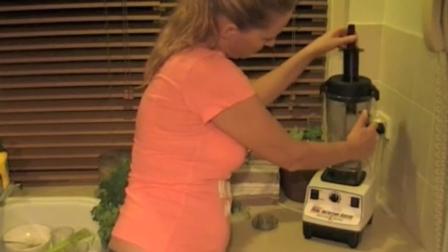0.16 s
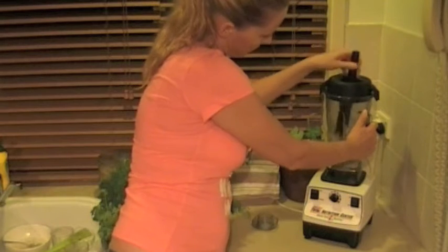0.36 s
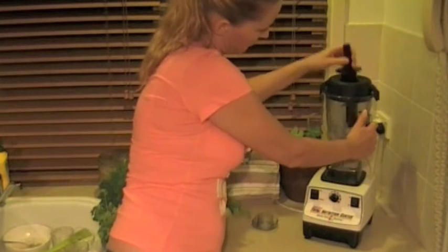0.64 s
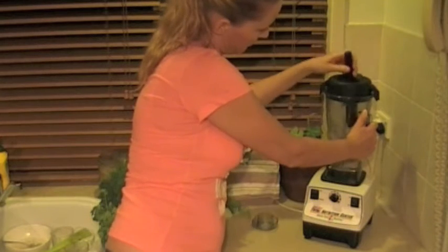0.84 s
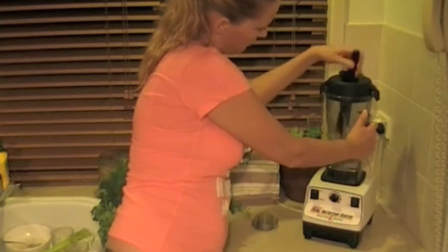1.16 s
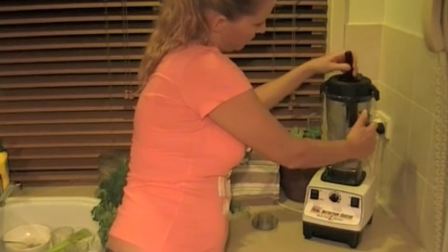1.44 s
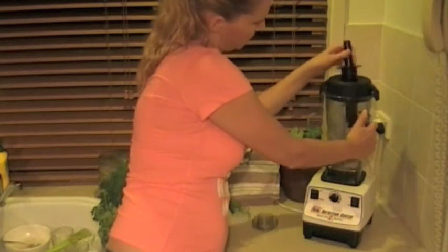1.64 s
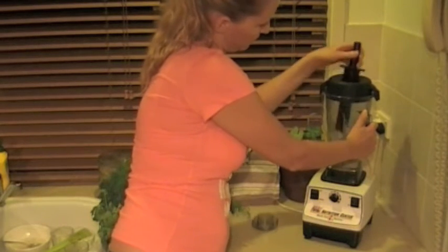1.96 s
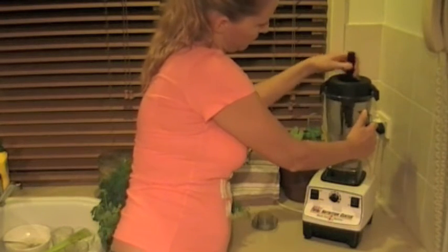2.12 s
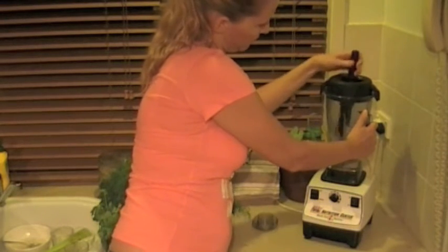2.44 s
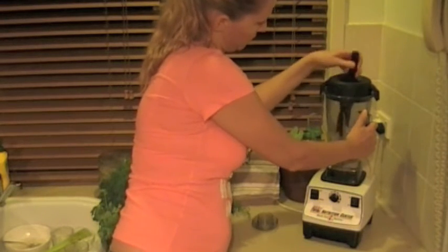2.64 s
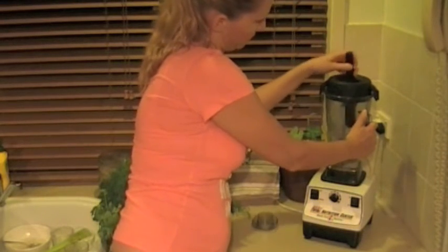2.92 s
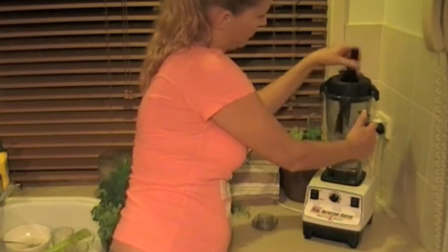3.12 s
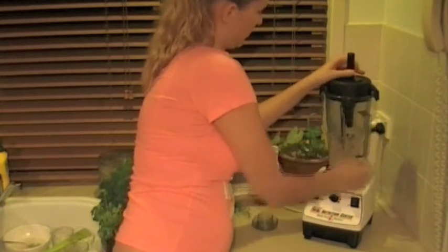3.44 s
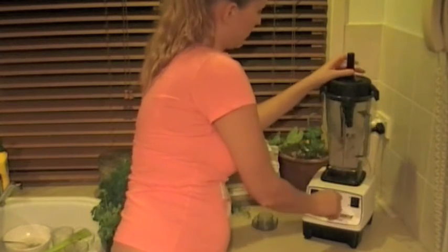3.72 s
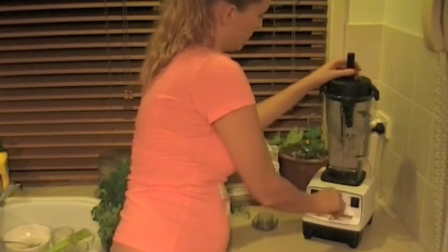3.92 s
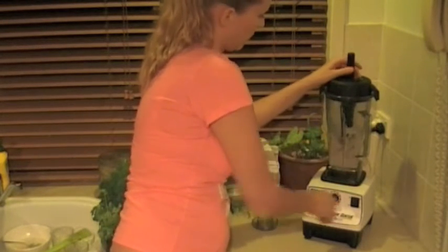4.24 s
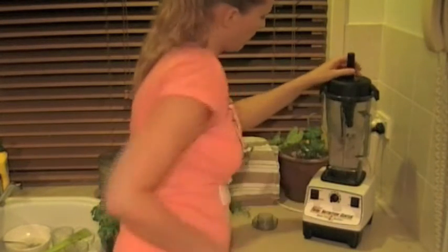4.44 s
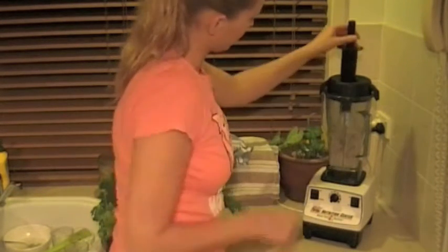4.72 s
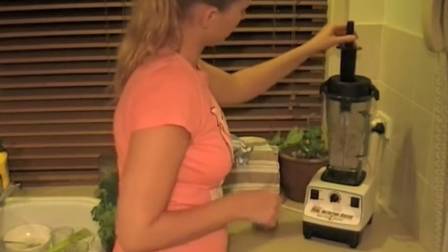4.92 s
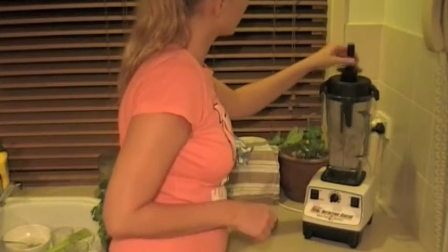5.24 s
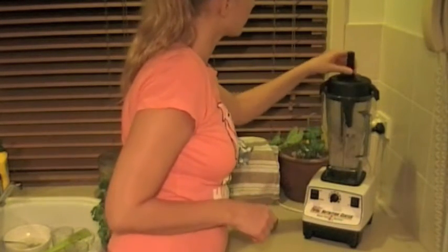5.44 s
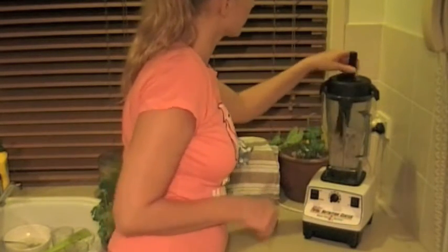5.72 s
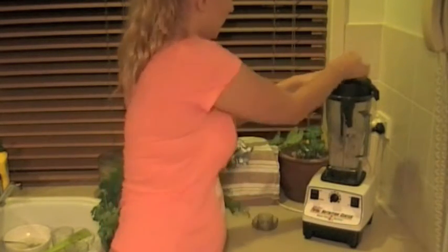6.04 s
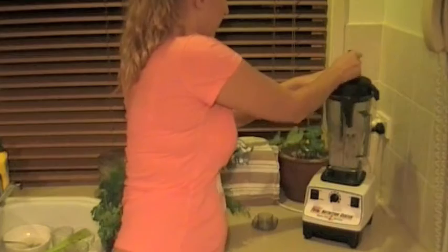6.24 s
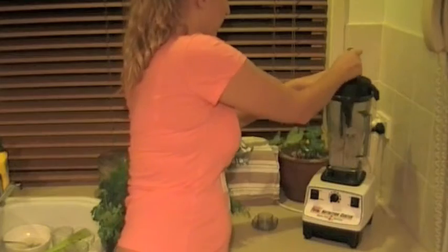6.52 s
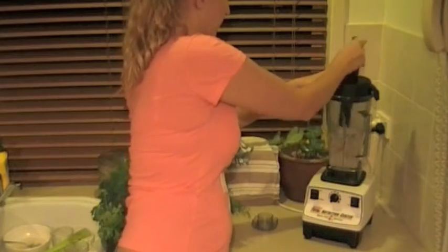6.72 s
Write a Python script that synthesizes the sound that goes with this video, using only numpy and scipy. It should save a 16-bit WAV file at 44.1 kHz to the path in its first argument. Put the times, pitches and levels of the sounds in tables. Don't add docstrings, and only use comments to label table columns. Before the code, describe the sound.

In a hard tiled kitchen, a blender runs at low speed, its food rattling gustily while hard bits crack against the jar and a tamper thuds dully. Just before four seconds it switches to high; the rattle surges louder, the motor pitch climbs unsteadily, and a whining, hissing roar holds to the end. A small camera microphone gives thin bass.

```python
import sys
import numpy as np
from scipy import signal
from scipy.fft import rfft, irfft
from scipy.io import wavfile
from scipy.ndimage import uniform_filter1d

SR = 44100
rng = np.random.default_rng(int(sys.argv[2]) if len(sys.argv) > 2 else 0)


def wav_record(signal):
    frames = np.transpose(np.atleast_2d(signal))
    bounded = np.clip(frames, -1, 1)
    quanta = np.round(bounded * 32767).astype(np.int16)
    wavfile.write(sys.argv[1], SR, quanta)


def attenuation_scalar(level_db):
    decades = np.asarray(level_db, float) / 20
    return 10 ** decades


N = 302967
SWITCH_S, SPIN_UP_S = 3.745, 0.05


def evened(x):
    return x / np.sqrt(np.mean(abs(x) ** 2) + 1e-20)


def read(points, hz):
    f, value = np.transpose(points)
    return np.interp(np.log(hz + 1), np.log(f + 1), value)


def add(mix, s, sound):
    part = mix[round(s * SR):][:len(sound)]
    part += sound[:len(part)]


def ramp(t, start_s, length_s):
    return np.clip((t - start_s) / length_s, 0, 1)


def swells(t, rows):
    s, length, *columns = np.transpose(rows)
    coarse = t[::64]
    humps = np.cos(np.pi / 2 * np.clip(2 * (coarse[:, None] - s) / length, -1, 1)) ** 2
    return [np.interp(t, coarse, humps @ c) for c in columns]


def wobble(size, width_hz):
    r = np.exp(-np.pi * width_hz / SR)
    z = rng.standard_normal((size + 4000, 2)) @ [1, 1j]
    return evened(signal.lfilter([1], [1, -2 * r, r * r], z)[4000:])


def bell(hz, middle, width):
    return 1 / (1 + (2 * (hz - middle) / width) ** 2)


def ringing(hz, rings):
    return 1 + sum(attenuation_scalar(db) * bell(hz, f, w) for f, w, db in rings)


def notched(hz, gaps):
    return np.prod([1 - min(depth, .9) * bell(hz, f, w) for f, w, depth in gaps], axis=0)


def kitchen(x):
    at = np.arange(120, 12000, 22) + rng.integers(0, 22, (2, 540))
    taps = np.zeros((2, 12100))
    decay = attenuation_scalar(-60 * at / SR / 0.34)
    np.put_along_axis(taps, at, rng.choice([-1., 1.], at.shape) * decay, 1)
    return signal.fftconvolve(x[None], taps / np.linalg.norm(taps[0]), axes=1)[:, :N]


def buzz():
    # frequency in Hz, level in dB.
    mains_lines = [(200.2, -76), (500.3, -49), (600.3, -50), (700.5, -53)]
    t = np.arange(N) / SR
    hum = np.zeros(N)
    for hz, db in mains_lines:
        unsteady = 1 + 0.44 * wobble(N, 10.0)
        hum += attenuation_scalar(db) * (np.exp(2j * np.pi * hz * t) * unsteady).real
    return np.sqrt(2) * hum * attenuation_scalar(-5 * ramp(t, SWITCH_S, SPIN_UP_S))


def squeals():
    # start in seconds, length in seconds, frequency in Hz, width in Hz, level in dB.
    squeal_rows = [(.08, .34, 446, 10, -41), (0, .08, 9200, 90, -44), (.12, .22, 9100, 120, -39),
                   (.62, .14, 9450, 150, -44), (2.27, .08, 10400, 100, -46), (4.76, .45, 390, 30, -48),
                   (4.27, .1, 944, 20, -29), (6.42, .16, 3560, 50, -33), (3.47, .25, 145, 10, -62),
                   (5.9, .5, 7300, 90, -41), (4.8, 1.5, 8850, 160, -42), (.36, .17, 447, 12, -44),
                   (.05, .35, 3400, 90, -41), (5.62, .2, 2520, 40, -37), (3.2, .13, 1060, 50, -38)]
    out = np.zeros(N)
    for s, length, hz, width_hz, db in squeal_rows:
        t = np.arange(0, length, 1 / SR)
        tone = (np.exp(2j * np.pi * hz * t) * (.7 + .7 * wobble(len(t), width_hz))).real
        add(out, s, attenuation_scalar(db) * tone * signal.windows.tukey(len(t), .4))
    return out


def splashes():
    # start in seconds, length in seconds, frequency in Hz, width in Hz, level in dB.
    splash_rows = [
        (.65, .06, 10600, 900, -43),
        (1.27, .03, 9300, 1500, -42),
        (1.46, .07, 11200, 800, -43),
        (1.8, .04, 9300, 1300, -42),
        (2.39, .03, 10000, 900, -43),
        (2.87, .06, 10900, 1200, -41),
        (3.1, .03, 10800, 1000, -40),
        (3.22, .06, 10600, 1300, -41),
    ]
    out = np.zeros(N)
    for s, length, hz, width_hz, db in splash_rows:
        t = np.arange(0, length, 1 / SR)
        spray = (np.exp(2j * np.pi * hz * t) * wobble(len(t), width_hz)).real
        add(out, s, attenuation_scalar(db + 5.5) * spray * signal.windows.tukey(len(t), .6))
    return out


def bumps():
    # start in seconds, peak in dB, ring in Hz, t60 in seconds.
    bump_rows = [(0.37, -37, 325, 0.16), (0.719, -46, 384, 0.12), (0.892, -43, 272, 0.1),
                 (1.289, -43, 290, 0.12), (1.584, -36, 270, 0.085), (1.661, -41, 320, 0.17),
                 (1.803, -40, 377, 0.12), (2.454, -36, 320, 0.14), (2.569, -48, 312, 0.13),
                 (3.115, -27, 381, 0.081), (3.129, -38, 385, 0.1), (3.39, -53, 396, 0.12),
                 (3.824, -35, 382, 0.084), (6.845, -39, 353, 0.15)]
    out = np.zeros(N)
    t = np.arange(6000) / SR
    soft_onset = 1 - np.exp(-t / 0.0018)
    for s, db, hz, t60 in bump_rows:
        thud = np.sin(2 * np.pi * hz * t) + 0.12 * np.sin(np.pi * hz * t)
        add(out, s, attenuation_scalar(db - 1.5 - 60 * t / t60) * thud * soft_onset)
    return out


def knocks():
    # start in seconds, peak in dB, ring in Hz.
    knock_rows = [(0.275, -20, 1390), (0.519, -19.5, 1080), (0.99, -20.5, 2900), (1.04, -21.5, 1050),
                  (1.269, -16.5, 1075), (1.361, -31, 990), (1.489, -23, 896), (1.579, -14.5, 1086),
                  (2.039, -22, 865), (2.206, -30, 930), (2.343, -16.5, 1034), (2.421, -16.5, 1085),
                  (2.684, -20, 925), (2.803, -20, 936), (3.246, -26, 1080), (3.32, -20, 1010)]
    out = np.zeros(N)
    t = np.arange(6000) / SR
    wall = signal.butter(2, [700, 3300], "band", fs=SR)
    ring_shape = attenuation_scalar(-60 * t / 0.061) * (1 - np.exp(-t / 0.00062))
    for s, db, hz in knock_rows:
        crack = 1.7 * signal.lfilter(*wall, rng.standard_normal(len(t))) * attenuation_scalar(-60 * t / 0.094)
        ring = np.sin(2 * np.pi * hz * t) * ring_shape
        add(out, s, attenuation_scalar(db - 5) * (ring + crack))
    return out


def gusty_noise(colour, lift, gusts_db):
    hz = np.fft.rfftfreq(2048, 1 / SR)
    noise = rng.standard_normal(N) * attenuation_scalar(gusts_db)
    z = signal.stft(noise, nperseg=2048, noverlap=1536)[2]
    patches = uniform_filter1d(rng.standard_normal(z.shape), 30, 0)
    patches_db = evened(uniform_filter1d(patches, 6, 1))
    z = z * attenuation_scalar(read(colour, hz)[:, None] + patches_db) * lift[:, None]
    return evened(signal.istft(z, nperseg=2048, noverlap=1536)[1][:N])


def churn():
    # frequency in Hz, level in dB per Hz.
    slow_colour = [(40, -34), (120, -24), (330, -9), (420, -3), (490, 1), (570, 0), (650, -4.5), (950, 5),
                   (1300, 5.5), (1600, 3), (3000, 3.5), (4200, -1.5), (6000, -2), (7500, -29)]
    surge_colour = [(40, -42), (120, -38), (330, -20), (480, -6), (570, -5), (650, -4.5), (950, 6),
                    (1300, 4), (2000, 1), (2700, 5.5), (3500, 2.5), (4800, 0), (6000, -0.5), (7500, -12.5)]
    fast_colour = [(40, -50), (120, -44), (200, -31), (420, -16.5), (500, -5.5), (600, -7), (780, 0.5),
                   (1100, -3), (1300, -2), (2000, -2), (3200, -1), (4200, -1.5), (6000, -6), (7500, -9)]
    spray_colour = [(4500, -36), (6300, 4.5), (7500, 2), (9500, 2), (11000, 2), (12500, 2), (14300, 3.5),
                    (15000, 5), (15700, -1)]
    # frequency in Hz, width in Hz, lift in dB.
    body_rings = [(447, 15, 0), (505, 50, 3), (770, 40, -3), (862, 25, -2), (945, 40, -3), (1008, 25, -3),
                  (1062, 30, 0), (1890, 90, -3), (2430, 80, -4), (2900, 80, -5), (3620, 200, -6),
                  (4950, 300, -8), (7300, 120, -8), (8830, 100, -8), (14150, 150, -5), (14600, 150, -6)]
    # frequency in Hz, width in Hz, lift in dB.
    chop_rings = [(750, 20, -5.5), (1665, 87, -6.5), (1900, 25, -7.5), (3380, 150, -7), (3930, 60, -6),
                  (4800, 70, 1.5), (5150, 60, 0)]
    # frequency in Hz, width in Hz, depth 0-1.
    chop_gap = (3490, 280, 0.48)
    # frequency in Hz, width in Hz, depth 0-1.
    surge_gaps = [(1040, 120, .2), (1250, 150, .3), (2150, 200, .25), (3580, 220, 0.3), (5050, 700, .35)]
    # frequency in Hz, width in Hz, depth 0-1.
    counter_gaps = [(356, 20, 0.25), (398, 24, 0.75), (579, 33, 1), (632, 23, 0), (1283, 88, 0.38)]
    # middle in seconds, length in seconds, rattle change in dB, hiss change in dB.
    heaves = [(0.203, 0.22, 0, 2.5), (.7, .2, -1, 0.5), (1.402, 0.21, -1.5, -2), (1.506, .16, 1.5, 1.5),
              (1.695, 0.17, 2, 0), (1.89, 0.15, -2, -1.5), (2.047, 0.41, 1, 1), (2.32, 0.49, -1, -0.5),
              (2.615, .2, -1, 0), (2.894, 0.2, 1.5, 1.5), (3.03, 0.26, -1, -2), (3.415, 0.22, -1, -2.5),
              (3.582, .5, 1.2, -3), (3.866, 0.4, 5.5, -3.5), (3.955, 0.087, -1.5, -2), (4.033, 0.15, 4, -1),
              (4.14, 0.23, -1.5, -4), (4.3, .22, 4.8, -.6), (4.475, .12, 2, 1.7), (4.598, 0.25, 1.7, 1),
              (4.695, 0.13, -4.5, -3.5), (4.84, .2, 1.4, -2.5), (5.34, .2, 1.2, -.3), (5.48, 0.22, -1, 0),
              (5.68, 0.38, 0.1, 1.8), (5.98, .2, -2, 0.7), (6.2, .25, 0.4, 1.5), (6.72, 0.32, -1.7, -2.2)]

    hz, t = np.fft.rfftfreq(2048, 1 / SR), np.arange(N) / SR
    lift = ringing(hz, body_rings) * notched(hz, counter_gaps)
    chop_lift = lift * ringing(hz, chop_rings) * notched(hz, [chop_gap])
    surge_lift = lift * notched(hz, surge_gaps)
    shared_db = 0.24 * wobble(N, 16).real

    def layer(colour, layer_lift, gust_db, quick_db):
        gusts_db = shared_db + gust_db * wobble(N, 21).real + quick_db * wobble(N, 180).real
        return gusty_noise(colour, layer_lift, gusts_db)

    slow = layer(slow_colour, chop_lift, .8, 1.2)
    surge = layer(surge_colour, surge_lift, .8, .8)
    fast = layer(fast_colour, lift, .4, .6)
    hiss = layer(spray_colour, lift, .9, 1.1)

    switched = ramp(t, SWITCH_S, SPIN_UP_S)
    settled = ramp(t, 4.55, 0.178)
    rattle = np.sqrt(1 - switched) * slow
    rattle += np.sqrt(switched * (1 - settled)) * surge
    rattle += np.sqrt(settled) * fast
    hiss = hiss * attenuation_scalar(0.98 * (1 - switched) * wobble(N, 30).real)
    rattle_db, hiss_db = swells(t, heaves)
    rattle_db = rattle_db - 30.5 + 8.5 * switched
    hiss_db = hiss_db - 34 + 8.5 * switched
    return attenuation_scalar(rattle_db) * rattle + attenuation_scalar(hiss_db) * hiss


def motor():
    # time in seconds, shaft speed in Hz, unbalance tone in dB.
    shaft = [(3.901, 338, -55), (4.02, 387.1, -42.5), (4.2, 332, -65), (4.26, 372, -48), (4.38, 398, -46),
             (4.455, 438, -31.5), (4.66, 440, -33), (4.73, 503, -32), (4.78, 502, -30), (4.95, 490.9, -36),
             (5.41, 493.1, -35), (5.52, 533, -29.5), (5.66, 507, -28), (5.77, 505, -30), (6.17, 544, -33.5),
             (6.48, 503, -26.5), (6.69, 502, -29), (6.86, 525, -28)]
    # middle in seconds, length in seconds, change in dB.
    tone_swells = [
        (5.765, .08, -16),
        (6.29, 0.14, 5),
        (6.422, 0.062, 3),
        (6.76, 0.19, -1.5),
    ]
    # frequency in Hz, level in dB.
    housing = [(680, -37.5), (740, -46), (790, -32.5), (860, -51), (885, -37), (975, -42), (1008, -35),
               (1030, -39.5), (1065, -30)]
    # multiple of shaft speed, level in dB.
    blade_orders = [(3, -7), (4, 1), (5, -2), (6, -3), (7, -9), (8, -5), (9, -6), (10, -4), (29, -9)]
    commutator_bars, rasp_order = 22, 7

    s, *columns = np.transpose(shaft)
    t = np.arange(s[0], N / SR, 1 / SR)
    size = len(t)
    hz, tone_db = (uniform_filter1d(np.interp(t, s, c), size=1500) for c in columns)
    turn = 2 * np.pi * np.cumsum(hz) / SR

    tone_db = tone_db + swells(t, tone_swells)[0]
    second_db = read(housing, 2 * hz)
    blade_db = -34 - 0.3222 * np.maximum(hz - 494, 0)
    blade_db = blade_db + np.interp(t, [4.3, 4.47], [-7, 0])
    blade_db = blade_db - 2 * ramp(t, 5.45, .1)
    whine_db = -33.5 + .03 * np.minimum(hz - 505, 0)
    racing = 1. * (np.gradient(hz) * SR > 680)
    race_db = -14 * uniform_filter1d(racing, size=800)

    tone = np.exp(1j * turn) * (1 + .14 * wobble(size, 20))
    second = np.exp(2j * turn) * (.75 + .6 * wobble(size, 35))
    blades = np.zeros(size, complex)
    for k, db in blade_orders:
        blades += attenuation_scalar(db) * np.exp(1j * k * turn) * (.6 + wobble(size, 9 * k + 8))
    whine = np.exp(1j * commutator_bars * turn) * (.1 + wobble(size, 280))
    whine = whine * attenuation_scalar(2.5 * wobble(size, 8).real) * ramp(t, 4.24, .06)
    rasp = np.exp(1j * rasp_order * turn) * wobble(size, 160.4)
    rasp = rasp * ramp(t, 5.4, 0.17) * np.sqrt(bell(rasp_order * hz, 3650, 183))

    song = attenuation_scalar(tone_db) * tone + attenuation_scalar(second_db) * second
    song += attenuation_scalar(blade_db + race_db) * blades + attenuation_scalar(whine_db + race_db) * whine
    song += attenuation_scalar(-36.5) * rasp
    out = np.zeros(N)
    add(out, s[0], np.sqrt(2) * song.real * np.minimum((t - s[0]) / 0.017, 1))
    return out


def scene():
    # frequency in Hz, left-right likeness 0-1.
    likeness = [(60, .99), (300, 0.91), (1000, 0.99), (2500, 0.91), (4500, 0.91), (5600, 0.99), (8000, 1),
                (11000, 1), (14600, 1), (15500, .88)]
    # frequency in Hz, left minus right in dB.
    lean = [(60, 0.0), (180, 0.5), (550, 2), (1650, 1.5), (4970, 0.5), (15000, -0.5)]
    dry = buzz() + squeals() + splashes() + bumps() + knocks() + churn() + motor()
    hz = np.fft.rfftfreq(N, 1 / SR)
    same = np.clip(read(likeness, hz), 0, 1)
    ears = np.sqrt(same) * rfft(dry) + attenuation_scalar(-1.0) * np.sqrt(1 - same) * rfft(kitchen(dry))
    return irfft(ears * attenuation_scalar([[.5], [-.5]] * read(lean, hz)), N)


def roll_off(x):
    return signal.sosfilt(signal.butter(12, 16830, fs=SR, output="sos"), x)


def record(dry):
    thin = signal.lfilter(*signal.butter(2, 90, "high", fs=SR), dry)
    edge = signal.firwin(1023, 15730, window=("kaiser", 9), fs=SR)
    mix = signal.oaconvolve(thin, edge[None], "same")
    return roll_off(mix)


dry = scene()
out = record(dry)
wav_record(out)
```